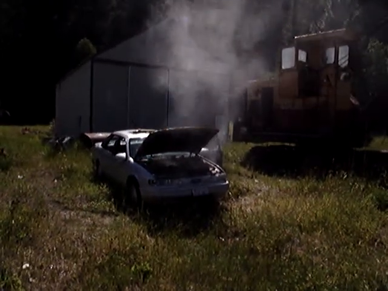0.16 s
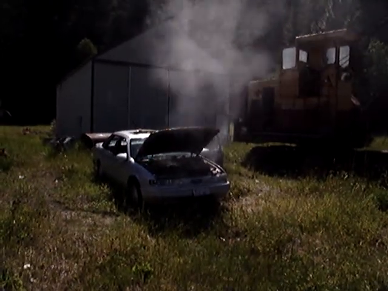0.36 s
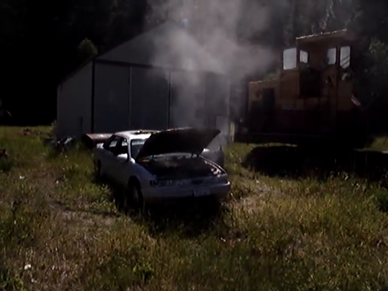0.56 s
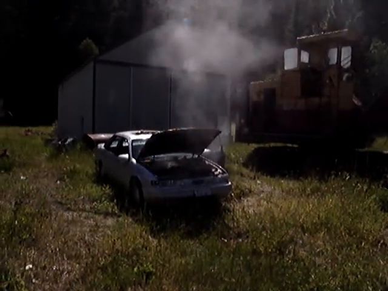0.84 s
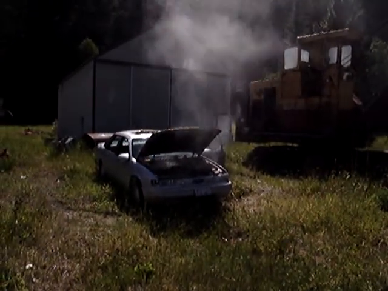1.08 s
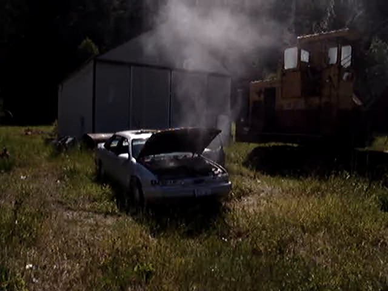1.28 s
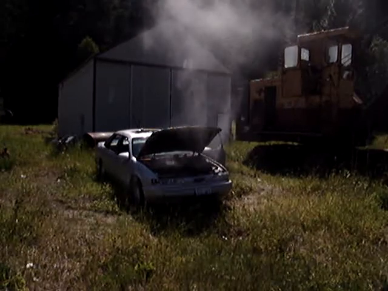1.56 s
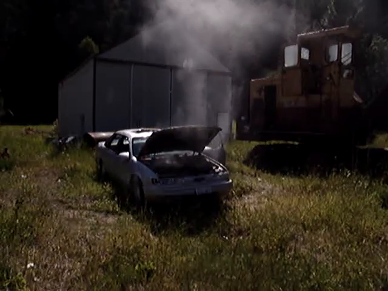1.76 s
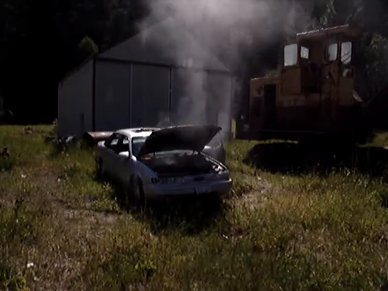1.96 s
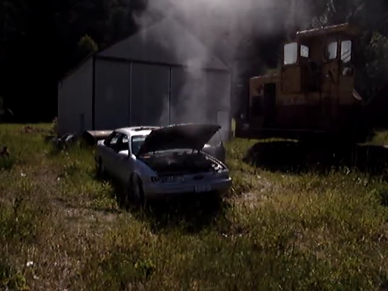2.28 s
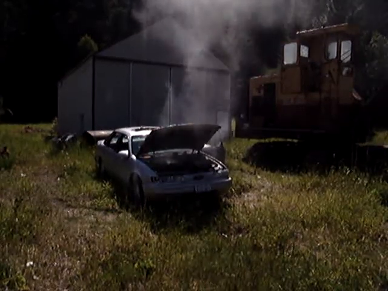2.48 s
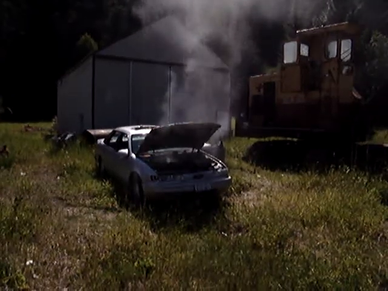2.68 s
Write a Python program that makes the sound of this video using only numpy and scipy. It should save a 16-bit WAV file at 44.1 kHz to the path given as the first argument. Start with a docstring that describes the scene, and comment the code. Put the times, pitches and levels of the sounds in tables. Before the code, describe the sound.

A damaged car engine runs at a fast idle outdoors from the start to about 2.8 seconds. Hard metallic knocks come about thirteen times a second, with softer ones between, over valve clatter and a steady airy roar. Scattered blows ring briefly, and a faint panel tone swells around 0.7 and 1.8 seconds. The engine slows slightly but keeps running throughout.

```python
"""A damaged car engine is running at a fast idle in a grassy yard, bonnet open, over a steady roar.
Each cycle brings a hard knock and, about half a cycle later, a softer one: each is a thump and a tight
cluster of metal impacts. The valve gear clatters alike in every cycle and the exhaust hums faintly.
As it runs on, some blows ring the block, a panel sings now and then, and the engine slows a little."""
import sys
import numpy as np
from scipy import signal
from scipy.fft import rfft, irfft
from scipy.io import wavfile
from scipy.ndimage import uniform_filter1d

SR = 44100
rng = np.random.default_rng(int(sys.argv[2]) if len(sys.argv) > 2 else 0)


def store_pcm(level_fs):
    """Save levels as 16-bit WAV."""
    pcm = np.round(np.clip(level_fs, -1, 1) * 32767).astype(np.int16)
    wavfile.write(sys.argv[1], SR, np.atleast_2d(pcm).T)


N = 124803
T = np.arange(N) / SR

# engine speed: time_s, cycles_per_s
ENGINE_SPEED = [(0, 13.26), (0.5, 12.976), (1.0, 12.925), (1.55, 12.799), (1.95, 12.503), (2.83, 12.373)]
# spectral envelopes of the knocks, valve gear and air: frequency_hz, gain_db
HARD_COLOUR = [(120, -36.5), (400, -16), (900, -14.5), (1400, -10.5), (2200, 2), (2900, -1), (3800, -5.5),
               (5200, -8), (6600, -4.5), (8800, -10.5), (10000, -15.5)]
SOFT_COLOUR = [(120, -27), (300, -7.5), (750, -1.5), (1150, -4), (1800, 1), (2800, 3.5), (3800, -5),
               (5200, -7), (6600, -5.5), (8800, -11.5), (10000, -14.5)]
VALVE_COLOUR = [(40, -41.5), (90, -20), (130, -4), (200, -7), (300, 2.5), (430, -2.5), (750, 2), (1100, 0),
                (1600, 1.5), (2600, 2), (4000, -10), (6500, -58.5)]
AIR_COLOUR = [(30, -44), (100, -33), (250, -9), (600, 4.5), (1100, 4), (1600, 11.5), (2600, 6),
              (3800, -1.5), (5200, -14), (6200, -40), (10000, -52)]
# resonances of the block and engine bay: centre_hz, width_hz, lift_db
BAY_MODES = [(130, 31, 6), (179, 17, 10.5), (296, 28, 5.5), (559.5, 22, 7), (652, 44, 4.5), (751, 40, 6),
             (852.5, 32, 7), (1021, 33, 4.5), (1326, 15, 6.5), (1493, 104, 6.5), (1873, 99, 1.5),
             (2119, 41, 1), (2530, 27, 0.5), (3297, 50, 5), (4530, 210, 4.5)]
# harder blows that ring one part of the block: peak_s, pitch_hz, level_db
HEAVY_BLOWS = [(.172, 2470, -15), (.325, 2810, -6), (.401, 2340, -15), (.630, 2240, -11), (.673, 720, -19),
               (.750, 710, -27.5), (.785, 2860, -14.5), (.824, 1860, -15.5), (0.94, 3186, -14.5),
               (1.017, 2840, -12.5), (1.580, 600, -19), (1.685, 860, -19.5), (1.797, 2760, -24),
               (1.837, 1870, -13), (1.840, 890, -16.5), (1.956, 2290, -19.5), (2.037, 2840, -16),
               (2.158, 1950, -16), (2.196, 2110, -19), (2.357, 2540, -11), (2.482, 689, -24.5),
               (2.596, 2930, -22), (2.641, 3100, -17), (2.723, 1920, -17)]
# pressure pulses of one cycle: cycle_share, pitch_hz, half_length_s, level_db
PRESSURE_PULSES = [(0.04, 165, 0.0039, -36.5), (.53, 270, 0.0025, -29.5), (0.349, 120, 0.0023, -44),
                   (0.64, 114, 0.0075, -45)]
# envelope of the singing panel: time_s, level_db
PANEL_ENVELOPE = [(0, -37), (.17, -45), (.5, -46), (.7, -36), (.95, -39), (1.22, -53), (1.58, -50),
                  (1.7, -38), (1.96, -38), (2.05, -46), (2.4, -43), (2.75, -41)]
# exhaust partials on the cycle rate: harmonic_number, level_db
EXHAUST_HARMONICS = [(4, -71), (6, -65.5), (8, -60), (10, -59), (14, -52.5)]


def knocks(share, colour, db, rise_s, fall_s, hiss, ragged_db, tail_db):
    """Impact excitation: tiny blows and a spit of gas drive the bay; a short crackling tail follows."""
    dt, cycle = nearest_passing(share)
    strength, width, tail_variation = rng.standard_normal((cycle.max() + 1, 3))[cycle].T  # per knock
    dt = dt / undb(0.95 * width)
    swell = np.exp(-(dt / np.where(dt < 0, rise_s, fall_s)) ** 2)
    swell *= undb(ragged_db * np.tanh(wander(700)))
    blow = swell * (impacts(per_s=3500) + hiss * rng.standard_normal(N))
    fade = (dt > 0) * np.exp(-(dt / 0.012) ** 2)
    tail = fade * undb(tail_db + 3 * tail_variation) * impacts(per_s=1100)
    force = undb(0.2 * strength) * (blow + tail)
    return level(through_bay(force, colour), db)


def block_rings(length_s=0.0045, linewidth_hz=170, size=2048):
    """Modal ringing: a heavy blow sounds one part of the block; phase drift broadens the spectral line."""
    out = np.zeros(N + size)
    dt = (np.arange(size) - size // 2) / SR
    envelope = np.exp(-np.abs(dt) / length_s)
    for peak_s, hz, db in HEAVY_BLOWS:
        drift = uniform_filter1d(np.cumsum(rng.standard_normal(size)), size=16)
        drift *= np.sqrt(2 * np.pi * linewidth_hz / SR)
        start = int(peak_s * SR) - size // 2
        out[start:start + size] += undb(db) * envelope * np.sin(2 * np.pi * hz * dt + drift)
    return out[:N]


def thumps():
    """Pressure pulses: low Gaussian wave packets recur at fixed points of the cycle."""
    out = np.zeros(N)
    for share, hz, half_length_s, db in PRESSURE_PULSES:
        dt, _ = nearest_passing(share)
        out += undb(db) * np.exp(-(dt / half_length_s) ** 2) * np.sin(2 * np.pi * hz * dt)
    return out


def valve_clatter(count=260):
    """Periodic excitation: the valve gear repeats one pattern of taps, varying a little in strength."""
    turns, _ = crank()
    shares = rng.random(count)
    polarity = np.sign(rng.standard_normal(count))
    tap_turns = np.arange(-1, turns[-1] + 1)[:, None] + shares
    at = np.interp(tap_turns, turns, np.arange(N), left=-1, right=-1).astype(int)
    strength = polarity * undb(0.41 * rng.standard_normal(at.shape))
    taps = np.bincount(at[at >= 0], strength[at >= 0], N)
    taps *= cycle_swell(depth_db=1.5, peak_share=0.39)
    return level(through_bay(taps, VALVE_COLOUR), db=-30.5)


def air_roar():
    """Flow noise: fan and intake air make a broad band that pulses with the cycle."""
    air = rng.standard_normal(N) * cycle_swell(depth_db=3.5, peak_share=0.17)
    air *= undb(0.23 * wander(2.9))
    return level(through_bay(air, AIR_COLOUR), db=-27.5)


def panel(pitch_hz=466.2, waver=0.0065):
    """Resonance: a panel shaken at its natural frequency sings and fades."""
    hz = pitch_hz * (1 + waver * wander(14))
    db = np.interp(T, *np.array(PANEL_ENVELOPE).T) + 1.8 * wander(25)
    return np.sqrt(2) * undb(db) * np.sin(2 * np.pi * np.cumsum(hz) / SR)


def exhaust_hum():
    """Harmonic series: the exhaust drones on even multiples of the cycle rate."""
    turns, _ = crank()
    phase = 2 * np.pi * (turns - PRESSURE_PULSES[0][0])  # zero at the first thump
    return sum(np.sqrt(2) * undb(db) * np.sin(harmonic * phase) for harmonic, db in EXHAUST_HARMONICS)


def yard(x, db=-8, t60_s=0.058, top_hz=2770):
    """Scattering: bonnet, ground and shed add a short, dull tail 4 ms behind the direct sound."""
    t = T[:SR // 4]
    tail = signal.sosfilt(signal.butter(4, top_hz, fs=SR, output="sos"), rng.standard_normal(len(t)))
    tail *= np.exp(-np.log(1000) * t / t60_s) * (t > .004)
    tail /= np.sqrt(np.sum(tail ** 2) * SR / 2 / top_hz)  # about unit gain in the passband
    return x + undb(db) * signal.fftconvolve(x, tail)[:N]


def through_bay(x, colour, size=8192):
    """Minimum-phase filtering: the bay's resonant peaks stand on a broad spectral envelope."""
    f = np.arange(size // 2 + 1) * SR / size
    hz, db = np.array(colour).T
    broad_db = np.interp(np.log(f + 1), np.log(hz), db)
    peaks_db = sum(lift / (1 + (2 * (f - centre) / width) ** 2) for centre, width, lift in BAY_MODES)
    cepstrum = irfft(np.log(undb(broad_db + peaks_db)))
    cepstrum[1:size // 2] *= 2  # folding onto positive time makes the response causal
    cepstrum[size // 2 + 1:] = 0
    response = irfft(np.exp(rfft(cepstrum)))
    return signal.oaconvolve(x, response)[:N]


def crank(first_knock_s=0.0192):
    """Phase as the integral of speed: cycles since the first knock, and cycles per second."""
    rate = np.interp(T, *np.array(ENGINE_SPEED).T)
    return np.cumsum(rate) / SR - first_knock_s * rate[0], rate


def nearest_passing(share):
    """Phase over speed: seconds from the nearest passing of this point of the cycle, and its number."""
    turns, rate = crank()
    cycle = np.round(turns - share)
    return (turns - share - cycle) / rate, cycle.astype(int) + 1


def cycle_swell(depth_db, peak_share):
    """Amplitude modulation: the engine is noisier in one part of its cycle."""
    turns, _ = crank()
    return undb(depth_db * np.cos(2 * np.pi * (turns - peak_share)))


def impacts(per_s):
    """Shot noise: like-sized clicks at random moments."""
    struck = rng.random(N) < per_s / SR
    return level(struck * np.sign(rng.standard_normal(N)), db=0)


def wander(rate_hz):
    """Low-pass noise: smoothed random steps with a spread near 1."""
    hold = int(SR / rate_hz)
    steps = np.repeat(rng.standard_normal(N // hold + 1), hold)
    return 1.3 * uniform_filter1d(uniform_filter1d(steps, hold), hold)[:N]


def level(x, db):
    """Scaling to an rms level."""
    return x * undb(db) / np.sqrt(np.mean(x ** 2))


def undb(db):
    """Decibels to amplitude ratio."""
    return 10 ** (np.asarray(db) / 20)


def scene():
    """Superposition: the sources add in one channel; only the metal blows scatter round the yard."""
    hard = knocks(share=0, colour=HARD_COLOUR, db=-24, rise_s=0.0058, fall_s=0.0075,
                  hiss=0.92, ragged_db=5.0, tail_db=-11)
    soft = knocks(share=0.527, colour=SOFT_COLOUR, db=-26.5, rise_s=0.0054, fall_s=0.008,
                  hiss=0.61, ragged_db=3.5, tail_db=-49)
    metal = yard(hard + soft + block_rings())
    return (metal + thumps() + valve_clatter() + air_roar() + panel() + exhaust_hum())[None]


def record(dry, bottom_hz=45, top_hz=9950):
    """Band limiting and soft saturation: thinner bass, rounded peaks and a steep cut to the treble."""
    thinned = signal.sosfilt(signal.butter(2, bottom_hz, "high", fs=SR, output="sos"), dry)
    rounded = .8 * np.tanh(thinned / .8)
    return signal.sosfilt(signal.ellip(12, .2, 90, top_hz, fs=SR, output="sos"), rounded)


dry = scene()
out = record(dry)
store_pcm(out)
```